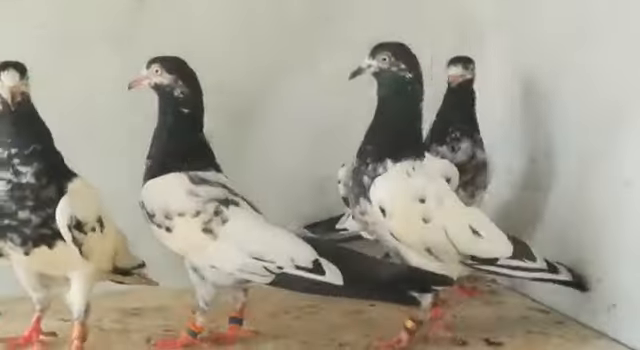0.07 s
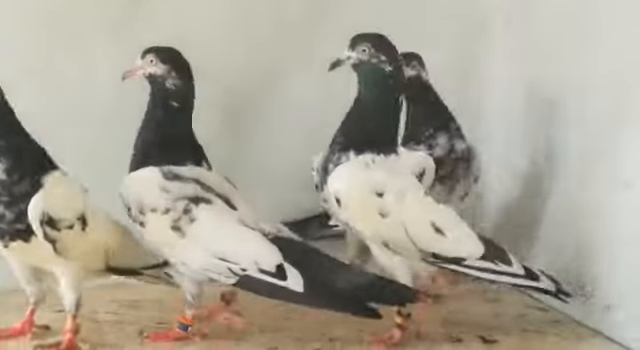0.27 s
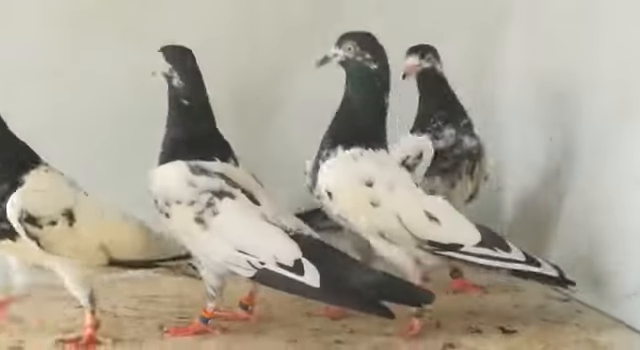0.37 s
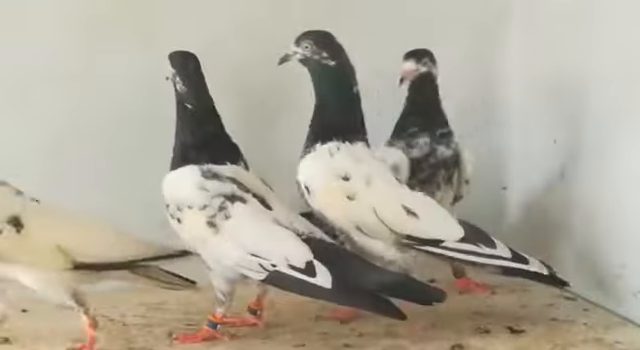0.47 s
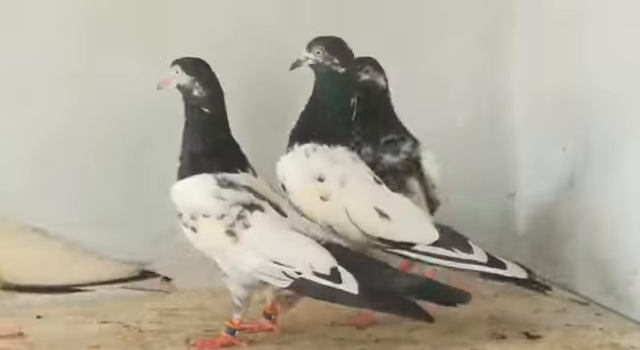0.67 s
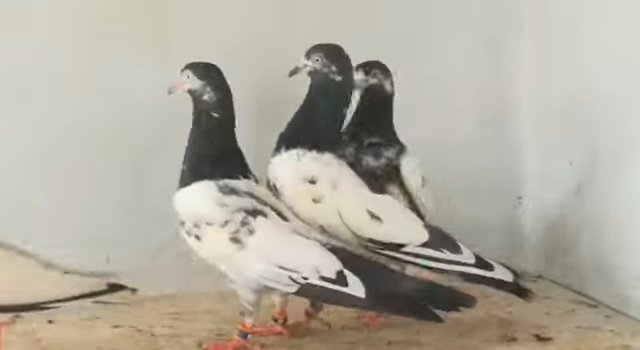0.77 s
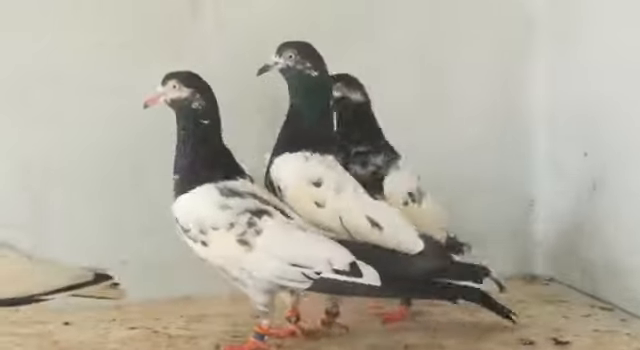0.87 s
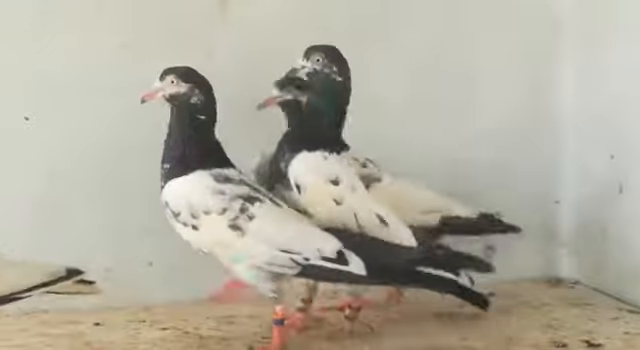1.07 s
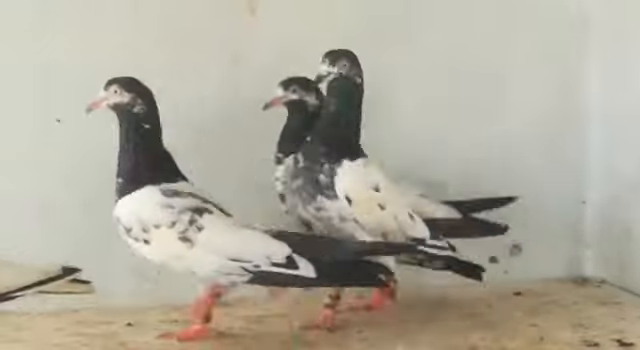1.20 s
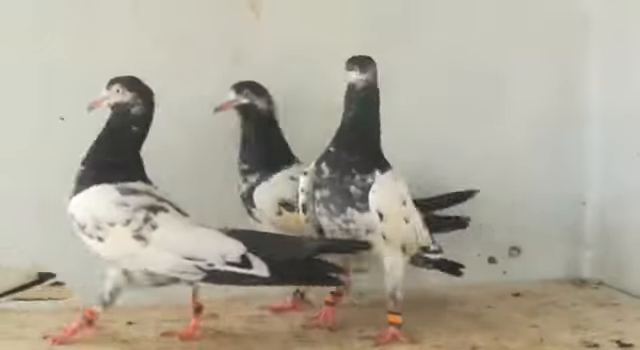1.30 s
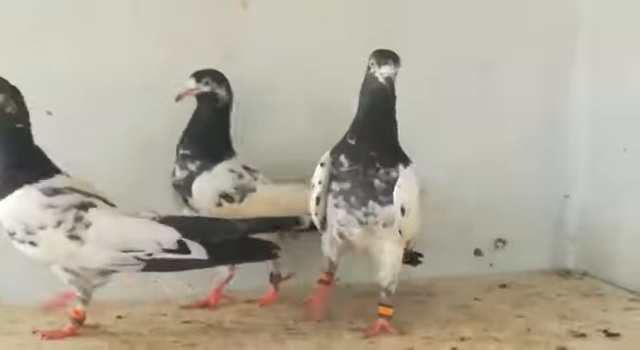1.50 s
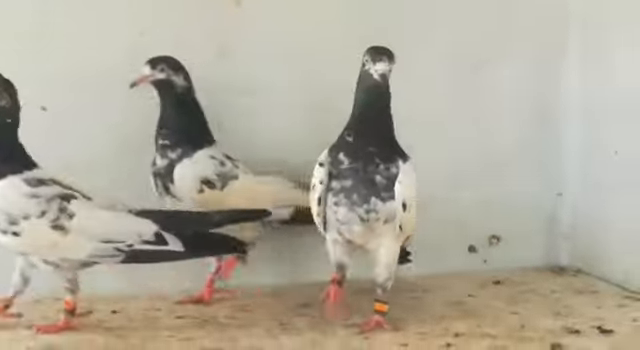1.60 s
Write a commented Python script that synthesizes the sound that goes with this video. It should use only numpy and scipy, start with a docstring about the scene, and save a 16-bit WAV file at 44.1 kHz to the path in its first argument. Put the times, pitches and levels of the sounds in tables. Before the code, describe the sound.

Pigeons step about with light claw taps and scuffs, over faint cooing and peeps.

```python
"""Claws tap and click, toes and feathers scuff: pigeons walk the dusty floor of a small hard-walled loft.
Each tap is a snap and a brief crunch, each scuff a swell of fine grit; one claw skids and squeaks.
Further off one bird gives a rough two-part coo and others peep thinly.
Under it lie a low rumble, a hum that swells and fades, and soft hiss."""
import sys
import numpy as np
from scipy import signal
from scipy.fft import rfft, irfft
from scipy.io import wavfile
from scipy.ndimage import map_coordinates

SR = 44100
rng = np.random.default_rng(int(sys.argv[2]) if len(sys.argv) > 2 else 0)


def materialize(psi):
    """Save the field psi as 16-bit PCM at rate SR to the path in sys.argv[1].

    A 1-D psi becomes a single channel; in a 2-D psi each row is a channel.
    """
    bounded = np.clip(np.atleast_2d(psi).T, -1, 1)
    quanta = np.round(bounded * 32767).astype(np.int16)
    wavfile.write(sys.argv[1], SR, quanta)


N = 72765
T = np.arange(N) / SR


def amp(db):
    """Decibels to gain."""
    return 10 ** (np.asarray(db) / 20)


def unit(x):
    """Scale to rms 1."""
    return x / np.sqrt(np.mean(x ** 2) + 1e-20)


def along(points, hz):
    """(Hz, value) points read on a log axis."""
    f, values = np.transpose(points)
    return np.interp(np.log(hz + 1), np.log(f + 1), values)


def wobble(knots_per_s):
    """Smooth random curve."""
    return map_coordinates(rng.standard_normal(2048), [T * knots_per_s + 2], mode="wrap")


def phase(hz):
    """Running phase in rad."""
    return 2 * np.pi * np.cumsum(hz) / SR


def swell(peak_s, rise_s, fall_s):
    """Peaked envelope, 10 dB down one rise before and one fall after."""
    return amp(-10 * np.where(T < peak_s, (peak_s - T) / rise_s, (T - peak_s) / fall_s))


def delayed(x, delay_s):
    """Fractional-sample delay."""
    hz = np.fft.rfftfreq(2 * N, 1 / SR)
    return irfft(rfft(x, 2 * N) * np.exp(-2j * np.pi * hz * delay_s))[..., :N]


def colour(x, points, tilt_db_oct=0, ring_hz=5000, ring_db=0):
    """Minimum-phase filter of unit energy: (Hz, dB) points, a tilt and one broad resonance."""
    size, pivot_hz, ring_oct = 4096, 5000, 0.28
    hz = np.fft.rfftfreq(size, 1 / SR)
    db = along(points, hz) + tilt_db_oct * np.log2(np.clip(hz, 2000, 10000) / pivot_hz)
    db += ring_db / (1 + (np.log2((hz + 1) / ring_hz) / ring_oct) ** 2)
    cepstrum = irfft(np.log(amp(db)))
    cepstrum[1:size // 2] *= 2
    cepstrum[size // 2 + 1:] = 0
    ir = irfft(np.exp(rfft(cepstrum)))
    return signal.fftconvolve(np.atleast_2d(x), ir[None] / np.linalg.norm(ir), axes=1)[:, :N]


def noise(points, shared):
    """Coloured stereo noise, rms 1; shared is the power fraction common to both sides."""
    white = rng.standard_normal((3, N))
    return unit(colour(np.sqrt(shared) * white[2] + np.sqrt(1 - shared) * white[:2], points))


# Wall return spectrum: f/Hz, level/dB
WALL_SPECTRUM = [(300, -1), (2300, 3), (3300, -1), (4500, 0.5), (6400, -3), (7400, -1), (9500, -8.5),
                 (11200, -17.5)]
# Loft decay: f/Hz, t60/s
LOFT_DECAY = [(200, 0.32), (1300, 0.11), (4000, 0.13), (7000, 0.14), (11000, 0.16)]

def loft(x, wet_db, predelay_s=0.005):
    """Direct sound plus the short reverberation of hard walls, different on each side."""
    hz, t, spectra = signal.stft(rng.standard_normal((2, SR // 3)), SR, nperseg=256)
    db = along(WALL_SPECTRUM, hz)[:, None] - 60 * t / along(LOFT_DECAY, hz)[:, None]
    tail = signal.istft(spectra * amp(db), SR, nperseg=256)[1]
    tail = np.pad(tail / np.linalg.norm(tail[0]), ((0, 0), (int(predelay_s * SR), 0)))
    return x + amp(wet_db) * signal.fftconvolve(np.atleast_2d(x), tail, axes=1)[:, :N]


# Floor and corner echoes: delay/s, level/dB, side (0 left, 1 right)
CLOSE_ECHOES = [(0.0012054, -12.5, 0), (0.00047, -32.5, 1), (.0023, -1.5, 1)]

def corner(pair, pan_left_db, right_lag_s=1e-5, trim_db=-0.5):
    """Floor sounds reach the left first and louder; floor and corner add close echoes."""
    direct = np.array([pair[0], delayed(pair[1], right_lag_s)])
    echoes = np.zeros((2, N))
    for delay_s, db, side in CLOSE_ECHOES:
        echoes[round(side)] += amp(db) * delayed(direct[round(side)], delay_s)
    return (direct + echoes) * amp(trim_db) * amp([[pan_left_db], [-pan_left_db]])


# Hum envelope: t/s, level/dB
HUM_ENVELOPE = [(0, -40.5), (0.07, -72), (0.2, -49.5), (0.32, -43.5), (0.55, -51), (0.62, -46),
                (0.78, -49.5), (1.0, -49), (1.2, -72), (1.65, -49)]
# Rumble spectrum: f/Hz, level/dB
RUMBLE_SPECTRUM = [(15, 4.5), (25, -7.5), (40, 2), (65, 2), (90, 1), (145, 0.5), (200, -11), (300, -21),
                   (480, -35), (900, -44), (2000, -75)]
# Hiss spectrum: f/Hz, level/dB
HISS_SPECTRUM = [(200, -1.5), (600, -4), (1400, -5), (2500, -6.5), (3100, 2.5), (3800, 10), (4700, -3.5),
                 (6000, -1), (7500, -12.5), (11000, -22), (11900, -21)]

def background(hum_hz=109.4, rumble_db=-48, hiss_db=-55.5, hiss_swell_db=3.5):
    """A wavering hum, distant rumble and soft, uneven hiss."""
    times, hum_db = np.transpose(HUM_ENVELOPE)
    hum = amp(np.interp(T, times, hum_db)) * np.sin(phase(hum_hz * (1 + 0.046 * wobble(28.4))))
    hiss = amp(hiss_db + hiss_swell_db * wobble(6.5)) * noise(HISS_SPECTRUM, shared=0.15)
    rumble = amp(rumble_db) * noise(RUMBLE_SPECTRUM, shared=0.999)
    return hum + rumble + hiss


# Coo contour: t/s, f/Hz, level/dB, growl (0-1)
COO_CONTOUR = [(0.698, 353, -60, 0.35), (0.769, 349.3, -52.5, 0.95), (0.794, 340.7, -44.5, 0.46),
               (0.824, 361.6, -46.5, 0.56), (0.852, 398.5, -46, 0.57), (0.884, 384.6, -47.5, 0.74),
               (0.923, 345.4, -43.5, 0.93), (0.959, 405, -58.5, 0.8), (1.012, 403.4, -58, 0),
               (1.056, 337, -61, 0.46), (1.11, 327.6, -48, 0.29), (1.17, 307.7, -50, 0.23),
               (1.205, 322.8, -51, 0.43), (1.245, 327.2, -48.5, 0.45), (1.29, 308.3, -46.5, 0.37),
               (1.358, 338, -47, 0.25), (1.391, 281.3, -49, 0.84), (1.43, 336, -60.5, 0.05),
               (1.518, 319, -73, 0.46)]

def coo(jitter=0.022, scatter_rad=0.7, growl_hz=44, octave_db=-18, fifth_db=-2.5):
    """A hollow tone that growls at first; a steadier fifth above comes in as the growl eases."""
    times, *columns = np.transpose(COO_CONTOUR)
    hz, db, growl = [np.interp(T, times, column) for column in columns]
    rough_phase = phase(hz * (1 + jitter * wobble(90.37))) + scatter_rad * growl * wobble(220)
    tone = np.sin(rough_phase) + amp(octave_db) * np.sin(2 * rough_phase)
    throb = phase(growl_hz * (1 + 0.1103 * wobble(29.91)))
    flutter = 1 + growl * (np.cos(throb) + 0.95 * np.cos(2 * throb))
    fifth = amp(fifth_db) * np.clip(1 - growl, 0, 1) * np.sin(1.5 * phase(hz))
    gate = (T > times[0]) & (T < times[-1])
    voice = amp(db) * (tone * flutter + fifth) * gate
    crop_band = signal.butter(7, [205, 560], "bandpass", fs=SR, output="sos")
    return loft(signal.sosfilt(crop_band, voice), wet_db=-5)


# Peeps: t/s, length/s, start f/Hz, end f/Hz, level/dB, rasp (fraction of f)
PEEP_CALLS = [(0.723, 0.028, 4910, 4885, -47.5, 0.016), (0.749, 0.029, 3665, 3630, -48.5, 0.018),
              (0.775, 0.034, 3574, 3940, -40, 0.0081), (0.765, 0.066, 4730, 4924, -49.5, .035),
              (0.847, 0.015, 3820, 3910, -47, 0.013), (1.084, 0.045, 4390, 3960, -55.5, 0.0452),
              (1.305, 0.024, 4040, 4230, -58, 0.0303), (1.315, 0.048, 5860, 6530, -57, 0.047),
              (1.406, 0.035, 4290, 4120, -57.5, .03), (1.472, 0.094, 3950, 3336, -72, 0.036)]

def peeps(waver=0.005):
    """Birds further off give short, raspy, gliding whistles."""
    whistles = np.zeros(N)
    for start_s, length_s, start_hz, end_hz, db, rasp in PEEP_CALLS:
        progress = np.clip((T - start_s) / length_s, 0, 1)
        glide_hz = start_hz + (end_hz - start_hz) * progress ** 2
        hz = glide_hz * (1 + waver * wobble(430) + rasp * wobble(2500))
        envelope = np.sqrt(2 * np.abs(np.sin(np.pi * progress)))
        whistles += amp(db) * envelope * np.sin(phase(hz))
    return loft(whistles, wet_db=-5)


# Squeak partials: frequency ratio, level/dB
SQUEAK_PARTIALS = [(0.998, 4.5), (1.249, -4), (1.551, -5), (1.85, -9)]

def skid(peak_s=0.203, rise_s=0.0055, start_hz=1140, end_hz=916, slowing_s=0.0196, rasp=0.057):
    """A claw slides on the board and slows, so its rough squeak falls."""
    age_s = np.maximum(T - peak_s + rise_s, 0)
    hz = end_hz + (start_hz - end_hz) * np.exp(-(age_s / slowing_s) ** 2)
    squeak = sum(amp(db) * np.sin(phase(ratio * hz * (1 + rasp * wobble(900))))
                 for ratio, db in SQUEAK_PARTIALS)
    return amp(-42.5) * squeak * swell(peak_s, rise_s, fall_s=0.013)


def grit(contacts_per_s=1600, spread_db=4.5):
    """Dense tiny contacts of uneven size, rms 1."""
    hits = rng.random(N) < contacts_per_s / SR
    return unit(hits * rng.choice([-1, 1], N) * amp(spread_db * rng.standard_normal(N)))


# Scuffs: peak t/s, level/dB, rise/s, fall/s, tilt/(dB/oct)
SCUFF_STROKES = [(0.0, -49.5, 0.025, 0.074, -1.5), (0.1, -48.5, 0.025, 0.04, 3.5),
                 (0.218, -44.5, 0.025, 0.092, -1), (0.336, -40.5, 0.033, 0.0077, -2),
                 (0.408, -45.5, 0.022, 0.033, 13), (0.476, -44.5, 0.038, 0.026, 7),
                 (0.642, -46, 0.019, 0.054, -1.5), (0.731, -40, 0.017, 0.018, 3),
                 (0.85, -50.5, 0.077, 0.14, 1), (0.893, -46, 0.021, 0.021, 2.5),
                 (1.006, -46, 0.067, 0.028, -3.5), (1.07, -42.5, 0.028, 0.015, 5),
                 (1.251, -44, 0.015, 0.0088, 3), (1.379, -47.5, 0.021, 0.034, 2.5),
                 (1.441, -46, 0.0038, 0.0037, 5), (1.585, -56.5, 0.017, 0.023, 3),
                 (1.637, -52, 0.012, 0.0082, 12)]
# Scuff spectrum: f/Hz, level/dB
SCUFF_SPECTRUM = [(300, -26.5), (1500, -9.5), (2500, -11), (3600, 0.5), (6000, 1.5), (8000, -3),
                  (9800, -11.5), (11100, -8.5), (12000, -45)]

def scuffs():
    """Toes drag through dust and feathers brush: swells of fine grit, plus the one skid."""
    strokes = sum(amp(db) * colour(grit() * swell(peak_s, rise_s, fall_s), SCUFF_SPECTRUM, tilt)
                  for peak_s, db, rise_s, fall_s, tilt in SCUFF_STROKES)
    return corner(loft(strokes + skid(), wet_db=-8), pan_left_db=1)


# Claw strikes: t/s, level/dB, crunch t60/s, tilt/(dB/oct), snap (linear, signed), ring f/Hz
CLAW_STRIKES = [(0.2156, -37, 0.02, 1, -2, 7000), (0.2306, -37, 0.007, 1, -9, 6550),
                (0.2402, -35, 0.028, 1.5, -1, 5660), (0.2728, -37, 0.032, 11, 3.5, 5950),
                (0.3075, -27.5, 0.016, -3.5, -2, 5300), (0.3118, -35.5, 0.042, 4, 1.5, 7300),
                (0.596, -42, 0.063, -3, 0, 3220), (0.6036, -41.5, 0.075, 0, 3.5, 6400),
                (0.6601, -30.5, 0.01, 5.5, -1.5, 3340), (0.8198, -22, 0.0085, 4, 4.5, 4050),
                (0.928, -35.5, 0.098, 0, 3, 8400), (0.9417, -15.5, 0.014, 0, 6, 2220),
                (1.0327, -28.5, 0.008, 0, 5, 4240), (1.0353, -28, 0.021, -4, 1.5, 3120),
                (1.159, -35.5, 0.022, -3, -1, 4400), (1.168, -37.5, 0.019, 0, 9, 3510),
                (1.2383, -40.5, 0.012, -6, -0.5, 7740), (1.250, -54, 0.01, -12, -6.5, 4530),
                (1.378, -39.5, 0.032, 0.5, 3, 5800), (1.564, -40, 0.013, 8, -5.5, 6500)]
# Tap spectrum: f/Hz, level/dB
TAP_SPECTRUM = [(150, -37), (400, -8.5), (800, -19), (1100, -13.5), (1750, -17.5), (2300, -11.5),
                (2550, -14), (3100, -5), (4300, -1.5), (5900, 3.5), (7200, -4), (8800, -1), (10000, -8),
                (11300, -7), (12300, -33), (15000, -42.5)]

def claw_taps():
    """A claw strikes with one snap and a brief crunch; walls, floor and corner answer."""
    taps = np.zeros((2, N))
    for start_s, db, t60_s, tilt, snap, ring_hz in CLAW_STRIKES:
        start = round(start_s * SR)
        age_s = T[:N - start]
        contact = np.zeros(N)
        contact[start:] = rng.standard_normal(N)[:N - start] * amp(-60 * age_s / t60_s)
        contact[start] = -snap
        tap = colour(contact, TAP_SPECTRUM, tilt, ring_hz, ring_db=9.5)
        taps += amp(db) * loft(tap, wet_db=-6.5)
    return corner(taps, pan_left_db=2.5)


def scene():
    """All the birds in their loft, over the background."""
    return claw_taps() + scuffs() + peeps() + coo() + background()


def record(dry):
    """Steep low-pass on the top treble."""
    cutoff_hz, order = 12602, 16
    hz = np.fft.rfftfreq(2 * N, 1 / SR)
    return irfft(rfft(dry, 2 * N) / np.sqrt(1 + (hz / cutoff_hz) ** (2 * order)))[:, :N]


dry = scene()
out = record(dry)
materialize(out)
```